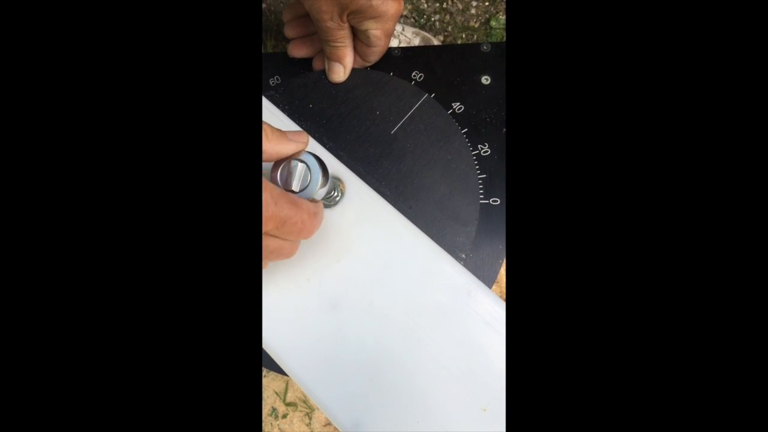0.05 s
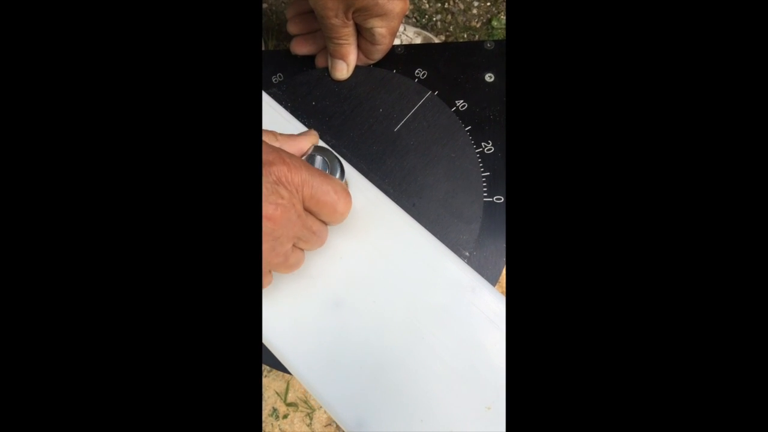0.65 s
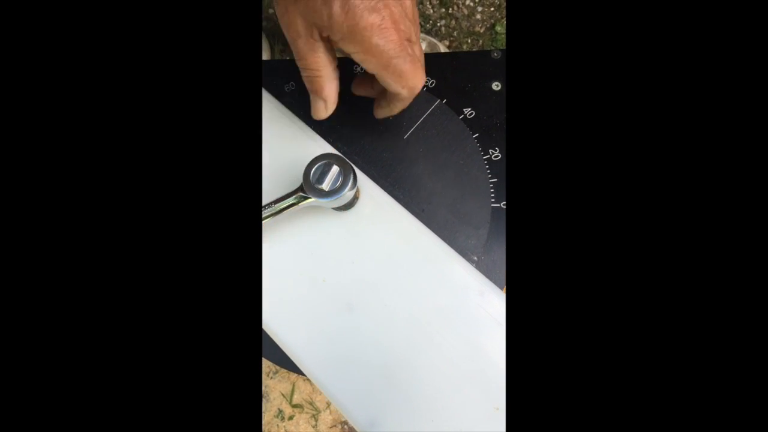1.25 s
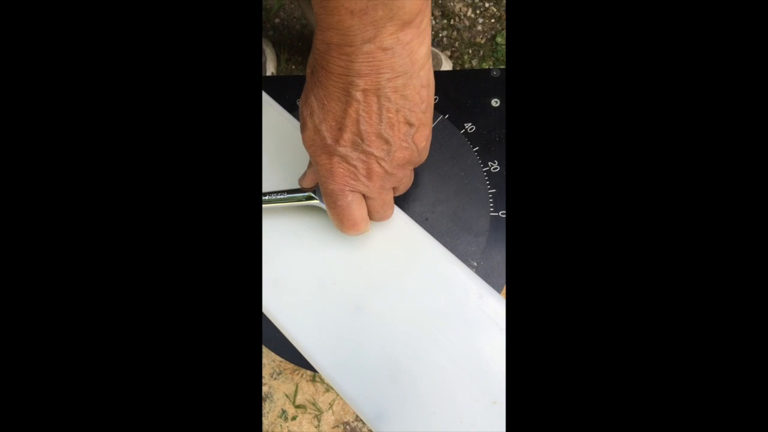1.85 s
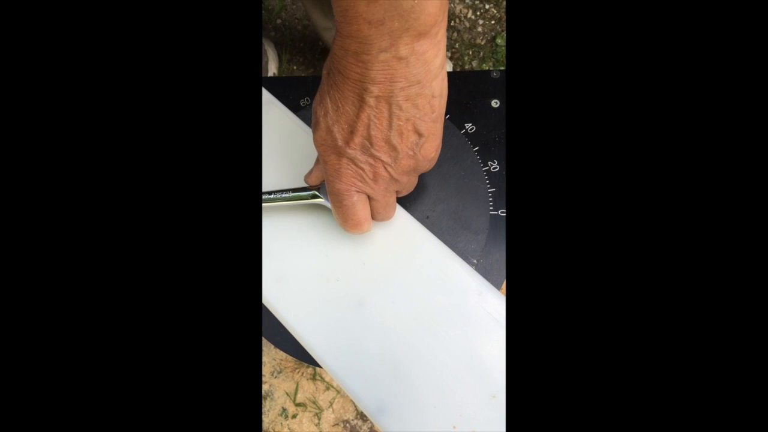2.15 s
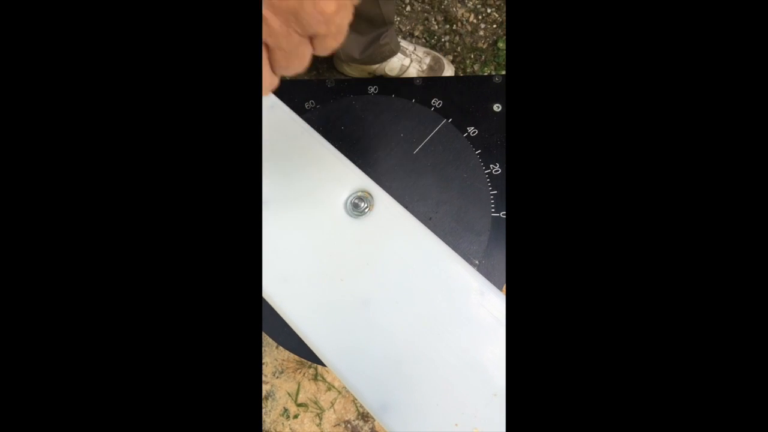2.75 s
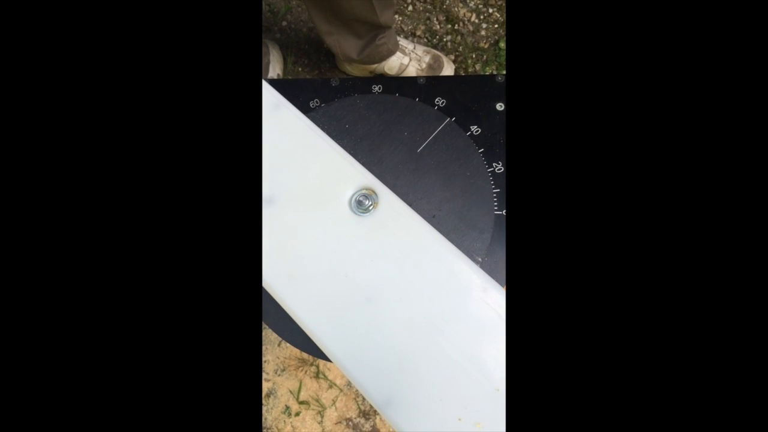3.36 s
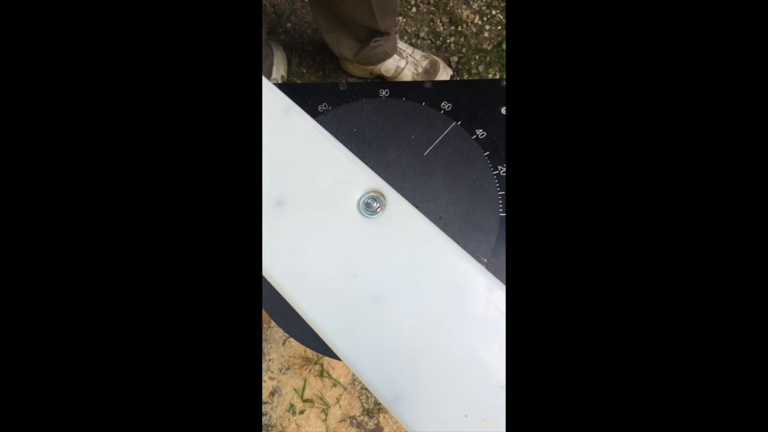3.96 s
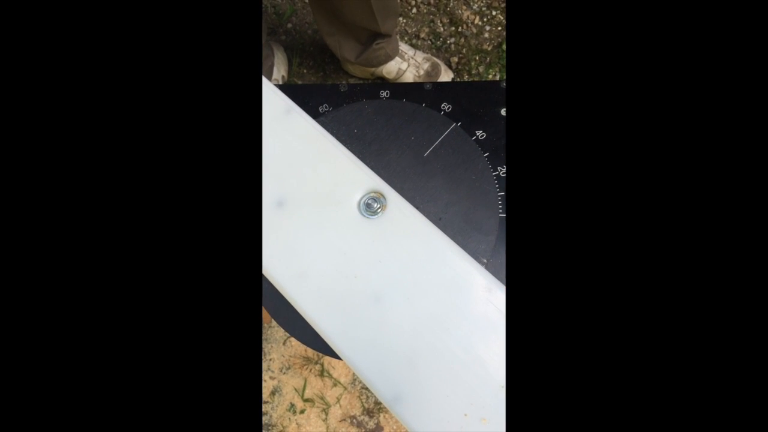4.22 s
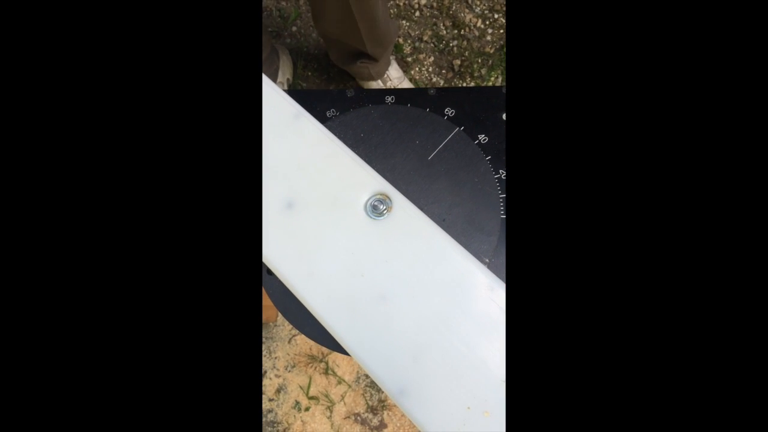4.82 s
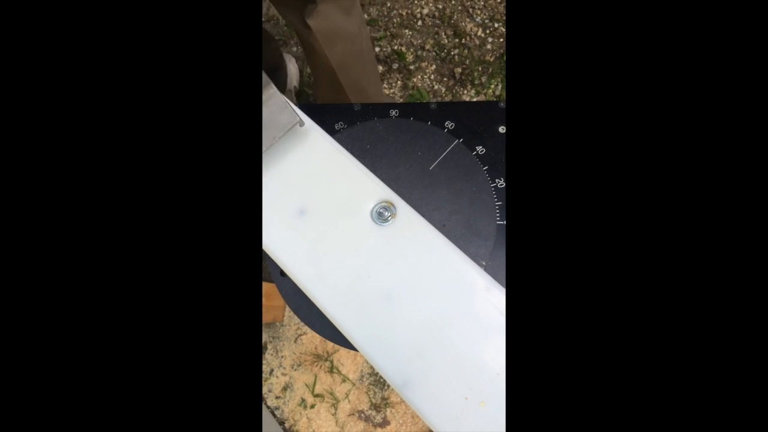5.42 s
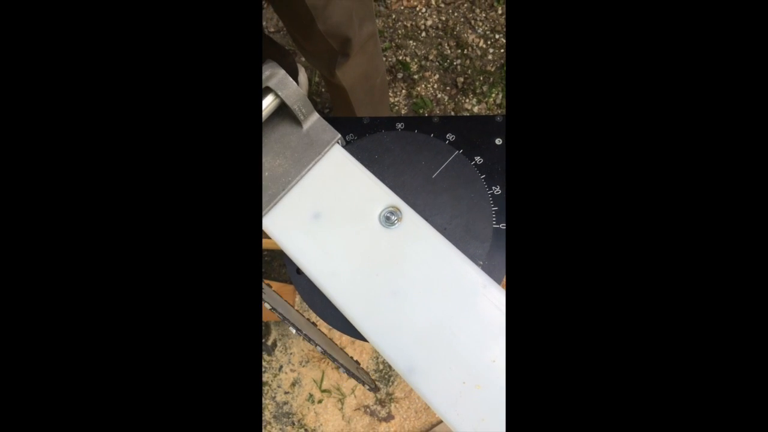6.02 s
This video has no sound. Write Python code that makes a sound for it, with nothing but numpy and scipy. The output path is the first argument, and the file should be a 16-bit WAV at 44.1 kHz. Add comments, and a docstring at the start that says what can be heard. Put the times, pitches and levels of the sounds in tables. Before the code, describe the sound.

The sound is heard from just above a metal cutting table in still outdoor air, with a faint, high insect sizzle coming and going. From 0.2 to 0.8 seconds a ratchet wrench clicks and skids onto a nut, with a small ping near 0.4 and a sharp clack at 0.6. Between 1 and 3 seconds there is faint rubbing of skin on steel, soft microphone handling bumps and a few light clicks. From about 3 to 4.6 seconds the pivoting fence slides quietly on its plate with a low groan. At 3.9 the wrench drops on the table with a double clank and a brief ring, the loudest moment. Small ticks follow, and a shoe scuffs gritty soil from 4.5 onward. The fence knocks three times at about 5.6, 5.8 and 6 seconds, the last with a short metallic ring.

```python
"""Outdoors at a metal cutting table. A ratchet wrench clicks and skids on a nut, then drops on the table.
The pivoting fence slides on its plate, swings round and knocks three times. Each blow excites the
table's modes and rings the part that strikes. A shoe scuffs gritty soil, hands rub and rumble close
to the microphone, and a faint insect sizzles in the grass over still air."""
import sys
import numpy as np
from scipy import signal
from scipy.fft import rfft, irfft, next_fast_len
from scipy.io import wavfile
from scipy.ndimage import uniform_filter1d

SR = 44100
rng = np.random.default_rng(int(sys.argv[2]) if len(sys.argv) > 2 else 0)


def materialize(psi):
    """Save the field psi as 16-bit PCM at rate SR to the path in sys.argv[1].

    A 1-D psi becomes a single channel; in a 2-D psi each row is a channel.
    """
    bounded = np.clip(np.atleast_2d(psi).T, -1, 1)
    quanta = np.round(bounded * 32767).astype(np.int16)
    wavfile.write(sys.argv[1], SR, quanta)


N = 268304
HIT_SAMPLES = 16384
TIME_S, AGE_S = np.arange(N) / SR, np.arange(HIT_SAMPLES) / SR
GRID_HZ = np.geomspace(30, 16000, 55)

# nut and wrench head under the hand: (mode [Hz], peak [dB], t60 [s])
HEAD_MODES = [(187, 7.5, 0.06), (409, 4.5, 0.065), (755.6, 3, 0.064), (875, 8, 0.023), (1451, 10, 0.079),
              (1900, 3, 0.014), (3050, 10, 0.032), (3654, 7, 0.02), (3980, 8, 0.026), (4970, -2, 0.038),
              (5510, -2.5, 0.072), (6810, 11, 0.013), (7360, 8.5, 0.015)]
# fence: (mode [Hz], level [dB], t60 [s])
FENCE_MODES = [(1040, -3, .05), (1980, -8, .05), (2262, 0, .11), (2290, -7, .085), (2274, -30, .4),
               (3000, -6, .035), (3990, -10, .06)]
# low friction of fence and shoe: (frequency [Hz], gain [dB])
DRAG_SPECTRUM = [(71, -38), (120, -14), (156, 3), (264, -8), (379, -3), (527, -7.5), (591, -19.5),
                 (750, -14.5), (980, -30), (1650, -120)]


def amp(db):
    """Decibels to gain."""
    return 10 ** (np.asarray(db) / 20)


def unit(x):
    """Scale to rms 1."""
    return x / np.sqrt(np.mean(x ** 2))


def add(out, time_s, x):
    """Mix x in at time_s."""
    i = max(int(time_s * SR), 0)
    out[i:i + len(x)] += x[:max(N - i, 0)]


def colour(x, spectrum):
    """Minimum-phase filter through (frequency [Hz], gain [dB]) points."""
    hz, db = np.transpose(spectrum)
    n = next_fast_len(len(x), True)
    bins_hz = np.maximum(np.arange(n // 2 + 1) * SR / n, 1)
    gain = amp(np.interp(np.log(bins_hz), np.log(hz), db))
    cepstrum = irfft(np.log(gain), n)
    cepstrum[1:n // 2] *= 2
    cepstrum[n // 2 + 1:] = 0
    return irfft(rfft(x, n) * np.exp(rfft(cepstrum)), n)[:len(x)]


def hump(db, hz, db_per_octave):
    """Gains on GRID_HZ, peaking at hz; slopes are (below, above)."""
    below, above = db_per_octave
    octave = np.log2(GRID_HZ / hz)
    return amp(db + below * np.minimum(octave, 0) - above * np.maximum(octave, 0))


def blend(first, second):
    """Power sum of two humps as (frequency [Hz], gain [dB])."""
    return np.column_stack([GRID_HZ, 20 * np.log10(np.hypot(first, second))])


def walk(rate_hz):
    """Slow random drift, rms 1."""
    step = int(SR / rate_hz)
    stairs = np.repeat(rng.standard_normal(400), step)[:N]
    return unit(uniform_filter1d(stairs, step))


def strokes(rows):
    """One rounded arch per movement; one gain curve per level column."""
    out = 0
    for start_s, length_s, *levels_db in rows:
        progress = np.clip((TIME_S - start_s) / length_s, 0, 1)
        arch = np.abs(np.sin(np.pi * progress)) ** 0.49
        out = out + np.outer(amp(levels_db), arch)
    return out


def friction(spectrum, grain_db):
    """Dense tiny slips of unequal size in uneven spurts, rms 1."""
    sizes = np.repeat(rng.exponential(size=N // 40 + 1), 40)[:N]
    slips = rng.standard_normal(N) * amp(grain_db * np.minimum(sizes, 5))
    spurts = amp(1.6 * walk(rate_hz=40))
    return unit(colour(slips * spurts, spectrum))


def fade(t60_s):
    """Free decay after a blow."""
    return np.exp(-np.log(1000) * AGE_S / t60_s)


def ring(modes, rattle=0, rise_s=0.00013):
    """Partials of a struck part; they flutter as it rattles on its support."""
    out = 0
    for hz, db, t60_s in modes:
        flutter = 1 + rattle * unit(uniform_filter1d(rng.standard_normal(HIT_SAMPLES), size=400))
        out = out + amp(db) * fade(t60_s) * flutter * np.sin(2 * np.pi * hz * AGE_S)
    return out * (1 - np.exp(-AGE_S / rise_s))


def body(modes):
    """Impulse response with resonance peaks of the given heights."""
    out = 0
    for hz, db, t60_s in modes:
        gain = amp(db) * 2 * np.log(1000) / (t60_s * SR)
        out = out + gain * fade(t60_s) * np.cos(2 * np.pi * hz * AGE_S)
    return out


def dense_modes(t60_3khz_s, low_hold, tail_db, tail_t60_s):
    """Countless short modes, unit energy; lows last longer, the surroundings add a faint tail."""
    out = 0
    for hz in 110 * 2. ** np.arange(8):
        edges_hz = [hz / np.sqrt(2), min(hz * np.sqrt(2), SR / 2 - 1)]
        band = signal.butter(2, edges_hz, "band", fs=SR, output="sos")
        t60_s = t60_3khz_s * (3000 / max(hz, 300)) ** low_hold
        envelope = fade(t60_s) + amp(tail_db) * fade(tail_t60_s)
        burst = rng.standard_normal(HIT_SAMPLES) * envelope
        out = out + unit(signal.sosfilt(band, burst)) * np.sqrt(hz)
    return unit(out) / np.sqrt(HIT_SAMPLES)


def air(rms_db):
    """Still outdoor background: steady noise, mostly low."""
    # background: (frequency [Hz], gain [dB])
    spectrum = [(15, -36.5), (25, -3.5), (59, -3.5), (161, 0.5), (270, -8.5), (560, -11.5), (754, -12.5),
                (911, -12.5), (6560, -22), (8140, -25), (9320, -25), (14400, -28.5), (16000, -40.5)]
    return amp(rms_db) * unit(colour(rng.standard_normal(N), spectrum))


def handling(hold_db, wander_db, grip_gain_db, bump_rise_s):
    """The hand on the microphone rumbles, shifts grip and bumps softly."""
    # rumble: (frequency [Hz], gain [dB])
    spectrum = [(12, -43), (20, -12), (39, -2.5), (59, 2.5), (113, -7), (188, -23.5), (220, -18.5),
                (250, -27), (320, -54.5), (550, -120)]
    # grip shifts: (start [s], length [s], relative level [dB])
    grips = [(.25, 0.56, -68), (.98, .34, -64.5), (1.33, 0.36, -60), (1.75, 0.097, -69), (2.02, 0.11, -62),
             (2.38, .22, -66), (3.13, 0.096, -70.5), (3.52, 0.23, -65.5), (4.08, 0.29, -64),
             (4.55, 0.19, -64.5), (5.68, 0.37, -65)]
    # soft bumps: (time [s], peak [dB], pitch [Hz])
    bumps = [(1.039, -53, 60.6), (1.436, -52, 55.3), (1.594, -42.5, 58), (1.645, -44.5, 69),
             (2.072, -45.5, 63), (2.554, -40.5, 62), (4.213, -38, 77.3)]
    shifts, = strokes(grips)
    hold = amp(hold_db + wander_db * walk(rate_hz=3.7))
    out = (hold + amp(grip_gain_db) * shifts) * friction(spectrum, grain_db=2.5)
    swell = (AGE_S / bump_rise_s * np.exp(1 - AGE_S / bump_rise_s)) ** 2
    for time_s, peak_db, hz in bumps:
        add(out, time_s, amp(peak_db) * swell * np.sin(2 * np.pi * hz * AGE_S))
    return out


def clicks(graze_s, graze_db):
    """Wrench on nut and slack in the fittings: a graze, then a dull clack with a steel tick."""
    # light contacts: (time [s], clack [dB], clack [Hz], tick [dB], tick [Hz])
    contacts = [(0.21, -10, 1110, 2, 5650), (0.2145, -2, 980, -20, 4960), (0.2358, -15, 750, -18, 4500),
                (0.255, -12, 900, -39, 4500), (0.266, -30, 900, -14, 4260), (0.3578, -30, 800, -8.5, 5400),
                (0.363, -2, 650, -5.5, 5730), (0.367, -5, 493, -15, 5000), (0.4305, -8, 2804, -2, 9570),
                (0.466, -8.5, 420, -24, 8500), (0.538, -16, 750, -38, 3500), (0.6, 13.5, 940, 2.5, 7300),
                (0.6049, 7.5, 510, -12, 6900), (0.619, 0.5, 860, -23, 5500),
                (0.655, -10, 1000, -31.5, 7000), (0.671, -10.5, 610, -36, 8000),
                (0.743, -10, 950, -27.5, 5480), (1.205, -16, 600, -16, 6400),
                (1.712, -20, 791, -29.5, 6140), (2.405, -3, 780, -15.5, 4400),
                (2.539, -30, 800, -22.5, 2980), (2.595, -12.5, 520, -46, 8000),
                (2.642, -29, 694, -8.5, 4740), (2.884, -8.5, 215, -55, 3000), (2.931, -13, 218, -37, 2500),
                (3.03, -32, 400, -19.5, 5670), (3.5, -25.5, 1000, -21, 2604),
                (4.238, -15, 1000, -39.5, 9070), (4.388, -12, 400, -8, 3000), (4.393, -8, 913, -18.5, 6480),
                (4.601, -8.5, 696, -41, 5000), (4.838, -13, 1120, -24, 4000),
                (5.021, -30, 600, -19.5, 10500), (5.026, -12, 220, -17.5, 6500), (5.35, -9, 480, -45, 5900),
                (5.508, 1.5, 430, -44, 8900)]
    out, head = np.zeros(N), body(HEAD_MODES)
    for time_s, clack_db, clack_hz, tick_db, tick_hz in contacts + pivot_slack(count=6):
        dense = dense_modes(t60_3khz_s=0.038, low_hold=0.38, tail_db=-32, tail_t60_s=0.055)
        hit = amp(-2) * dense + amp(-5.5) * head
        hit[0] += amp(-12)  # direct impulse
        clack = hump(clack_db, clack_hz, db_per_octave=(7, 10.14))
        tick = hump(tick_db, tick_hz, db_per_octave=(4.8, 17))
        spectrum = blend(clack, tick)
        add(out, time_s, colour(hit, spectrum))
        # the parts brush just before they seat
        ramp = AGE_S * (AGE_S < graze_s)
        graze = unit(rng.standard_normal(HIT_SAMPLES) * ramp) / np.sqrt(HIT_SAMPLES)
        add(out, time_s - graze_s, amp(graze_db) * colour(graze, spectrum))
    return out


def scrapes(grain_db, hiss_hz, db_per_octave):
    """Metal skids on metal: a short swell of tiny impacts rings the fittings."""
    # skids: (start [s], length [s], level [dB], centre [Hz], hiss [dB])
    skids = [(0.323, 0.04, -12, 1400, -26.5), (2.41, 0.026, -19.5, 1610, -52),
             (2.612, 0.045, -18, 2370, -31), (3.86, 0.048, 8.5, 800, -4.5), (5.927, 0.037, -5.5, 1590, -33),
             (5.974, 0.028, -3.5, 936, -37)]
    out, fittings = np.zeros(N), amp(-2) * body(HEAD_MODES)
    fittings[0] += 1  # direct impulse
    for start_s, length_s, db, hz, hiss_db in skids:
        sizes = amp(grain_db * np.minimum(rng.exponential(size=HIT_SAMPLES), 6))
        swell = np.sin(np.pi * np.minimum(AGE_S / length_s, 1))
        impacts = rng.standard_normal(HIT_SAMPLES) * sizes * swell
        chatter = signal.fftconvolve(impacts, fittings)[:HIT_SAMPLES]
        spectrum = blend(hump(db, hz, db_per_octave), hump(hiss_db, hiss_hz, db_per_octave))
        add(out, start_s, colour(unit(chatter) / np.sqrt(HIT_SAMPLES), spectrum))
    return out


def insect(start_hz, top_hz, creep_s, wander_hz, width_hz, flutter_db, rest_db):
    """Narrow, fluttering sizzle in phrases; its pitch wanders, creeps up and levels off."""
    # phrases: (start [s], length [s], level [dB])
    phrases = [(.4, 0.52, -76.5), (.93, 0.22, -81.5), (1.32, 0.78, -80), (2.06, 1.1, -84),
               (3.2, 0.33, -80.5), (4.25, 0.28, -81.5), (5.2, 0.72, -81)]
    song, = strokes(phrases)
    hz = top_hz - (top_hz - start_hz) * np.exp(-TIME_S / creep_s) + wander_hz * walk(rate_hz=7.4)
    carrier = np.exp(2j * np.pi * np.cumsum(hz) / SR)
    noise = rng.standard_normal(N) + 1j * rng.standard_normal(N)
    rasp = signal.sosfilt(signal.butter(2, width_hz / 2, fs=SR, output="sos"), noise)
    gain = (song + amp(rest_db)) * amp(flutter_db * walk(rate_hz=25))
    return gain * unit(np.real(rasp * carrier))


def socket_ping(time_s, gain_db):
    """The socket rings once as it slips over the nut."""
    # hand-held steel socket: (mode [Hz], level [dB], t60 [s])
    modes = [(6830, 1, 0.065), (7180, -23.5, .06), (9290, -36, .07), (11070, -12, 0.034),
             (14740, -14.5, 0.066), (15090, -28.5, .07)]
    out = np.zeros(N)
    add(out, time_s, amp(gain_db) * ring(modes))
    return out


def hand_rub():
    """Skin rubs on the steel wrench."""
    # rubs: (start [s], length [s], level [dB])
    rubs = [(1.1, 0.23, -64), (2.2, 0.25, -73), (2.5, 0.34, -82), (2.8, .3, -74.5)]
    # skin on steel: (frequency [Hz], gain [dB])
    spectrum = [(880, -41), (1500, 1), (2570, 0.5), (2940, 6), (3210, 0), (3480, 1.5), (10200, 0.5),
                (15500, -7)]
    rub, = strokes(rubs)
    return rub * friction(spectrum, grain_db=2.5)


def fence_slide(slide_gain_db, groan_gain_db):
    """The pushed fence slides on its plate with a low groan."""
    # pushes: (start [s], length [s], relative slide [dB], relative groan [dB])
    pushes = [(2.93, .24, -74, -70.5), (3.22, 0.23, -73, -67), (3.53, 0.26, -60, -64.5),
              (4.0, 0.27, -70, -67.5), (4.22, 0.38, -75.5, -71)]
    # fence on plate: (frequency [Hz], gain [dB])
    spectrum = [(350, -30), (600, -12.5), (696, -14), (923, 1), (1060, -4), (1400, -10.5), (2600, -17.5),
                (3460, -24), (6170, -22.5), (10300, -27), (15000, -35)]
    slide, groan = strokes(pushes)
    out = slide * amp(slide_gain_db) * friction(spectrum, grain_db=4)
    return out + groan * amp(groan_gain_db) * friction(DRAG_SPECTRUM, grain_db=2.5)


def table_blow(db, hz, edge_db, edge_hz, t60_3khz_s):
    """One contact excites the table's modes: a thud with a hard edge."""
    # table: (mode [Hz], peak [dB], t60 [s])
    modes = [(112, 5, .16), (147, 10, .14), (188, 5, .1), (340, 9, .075), (403, 6, .09), (493, 6, .08),
             (543, 9, .09), (643, 4, .1), (778, 8, .07), (922, 10, .08), (1030, 7, .065), (1250, 4, .06),
             (1450, 5, .055), (1830, 3, .07), (2430, 2, .06), (2850, 1, .06)]
    # weaker radiation below the lowest modes and in the gap above them: (frequency [Hz], gain [dB])
    radiation = [(30, 0), (75, -2), (140, -0.5), (255, -4), (370, 0)]
    dense = dense_modes(t60_3khz_s, low_hold=0.29, tail_db=-42, tail_t60_s=0.16)
    hit = amp(-2.5) * dense + amp(-9.5) * body(modes)
    hit[0] += amp(-16)  # direct impulse
    thud = hump(db, hz, db_per_octave=(6.2, 14.2))
    edge = hump(edge_db, edge_hz, db_per_octave=(2.5, 31))
    return colour(colour(hit, radiation), blend(thud, edge))


def knocks(rows, part_ring, edge_hz):
    """A part strikes the table, rings and rebounds with a softer edge."""
    out = np.zeros(N)
    for time_s, db, hz, edge_db, lag_s, rebound_db, rebound_hz, ring_db in rows:
        strike = table_blow(db, hz, edge_db, edge_hz, t60_3khz_s=0.031)
        rebound = table_blow(rebound_db, rebound_hz, edge_db - 6.5, edge_hz, t60_3khz_s=0.058)
        add(out, time_s, strike + amp(ring_db) * part_ring)
        add(out, time_s + lag_s, rebound)
    return out


def wrench_drop(fence_ring, fence_gain_db):
    """The wrench lands head first, then handle; the fence rings along."""
    # free wrench: (mode [Hz], level [dB], t60 [s])
    modes = [(3698, 0, .07), (3712, -31, .5), (6815, -11, .07), (6850, -26, .36), (7080, -2, .035),
             (9685, -12, .055), (11130, -33, .25), (13810, -17, .08), (14400, -8, .035), (14970, -11, .045)]
    # landings: (time [s], strike [dB], strike [Hz], edge [dB],
    # rebound lag [s], rebound [dB], rebound [Hz], ring [dB])
    landings = [(3.861, 27.5, 485, -1.5, .0043, 34, 157, -24),
                (3.9019, 28, 741, -19.5, .0056, 24, 560, -53)]
    out = knocks(landings, ring(modes, rattle=0.4), edge_hz=11500)
    for time_s, *_ in landings:
        add(out, time_s, amp(fence_gain_db) * fence_ring)
    return out


def settling(gap_s, loss_db, thud_hz):
    """Wrench and fence each settle in three soft, fading bounces."""
    # first bounces: (time [s], level [dB])
    first_bounces = [(3.943, 22.5), (5.627, 16.5)]
    out = np.zeros(N)
    for time_s, db in first_bounces:
        for k in range(3):
            bounce = table_blow(db - k * loss_db, thud_hz, db - 50.5, edge_hz=5630, t60_3khz_s=0.058)
            add(out, time_s + k * gap_s, bounce)
    return out


def pivot_slack(count, span_s=(4.1, 8.8), mean_db=-23.5, spread_db=6.5, clack_hz=600, tick_hz=5000):
    """Faint random clicks of slack in the pivot, as contact rows; those past the end go unheard."""
    when, size = rng.random((count, 2)).T
    levels_db = mean_db + spread_db * (2 * size - 1)
    times_s = span_s[0] + (span_s[1] - span_s[0]) * when
    return [(time_s, db, clack_hz, db - 14, tick_hz) for time_s, db in zip(times_s, levels_db)]


def fence_swing(fence_ring, stop_s, stop_gain_db):
    """The swung fence knocks three times; the last knock rings the end stop."""
    # knocks: (time [s], strike [dB], strike [Hz], edge [dB],
    # rebound lag [s], rebound [dB], rebound [Hz], ring [dB])
    swings = [(5.607, 13, 713, -20, 0.0053, 19, 326, -37.5), (5.818, 19.5, 970, -17, 0.0074, 23, 350, -30),
              (5.9645, 20, 1290, 0, .0035, 24.5, 160, -35)]
    # end stop: (mode [Hz], level [dB], t60 [s])
    stop_modes = [(2084, -4.5, 0.057), (2260, -0.5, 0.072), (2230, -26, 0.19), (2820, -5.5, 0.017),
                  (3500, -16, 0.037), (4620, -24.5, 0.052), (6040, -47, .04)]
    out = knocks(swings, fence_ring, edge_hz=5630)
    add(out, stop_s, amp(stop_gain_db) * ring(stop_modes, rattle=0.15))
    return out


def shoe_scuff(scuff_gain_db, scrape_gain_db):
    """A sole drags over grit: scuff, low scrape and sand hiss."""
    # drags: (start [s], length [s], relative scuff [dB], relative scrape [dB], sand [dB])
    drags = [(4.54, .2, -70, -75, -70), (4.68, .24, -58.5, -64, -68.5), (4.87, 0.38, -69, -61, -70),
             (5.22, 0.19, -71.5, -72.5, -72.5), (5.48, .36, -67, -71.5, -74), (5.9, 0.17, -63, -76, -95)]
    # sole on grit: (frequency [Hz], gain [dB])
    scuff_spectrum = [(290, -23), (500, -2.5), (636, -1), (764, -7), (926, 2.5), (1010, -2), (2040, -6.5),
                      (5000, -21), (6500, -70), (11000, -120)]
    # sand hiss: (frequency [Hz], gain [dB])
    sand_spectrum = [(2000, -6.5), (5000, -4), (9000, -7), (15000, -13)]
    scuff, scrape, sand = strokes(drags)
    out = scuff * amp(scuff_gain_db) * friction(scuff_spectrum, grain_db=2.5)
    out += scrape * amp(scrape_gain_db) * friction(DRAG_SPECTRUM, grain_db=2.5)
    return out + sand * friction(sand_spectrum, grain_db=2)


def scene():
    """Mono mix, heard from just above the table."""
    fence_ring = ring(FENCE_MODES, rattle=0.2)
    out = air(rms_db=-71)
    out += handling(hold_db=-78.5, wander_db=4, grip_gain_db=2, bump_rise_s=0.0059)
    out += clicks(graze_s=0.006, graze_db=-24)
    out += scrapes(grain_db=4, hiss_hz=9000, db_per_octave=(4.6, 12))
    out += insect(start_hz=7600, top_hz=8230, creep_s=1.8, wander_hz=71, width_hz=750,
                  flutter_db=3.5, rest_db=-91)
    out += socket_ping(time_s=0.4306, gain_db=-17.5)
    out += hand_rub()
    out += fence_slide(slide_gain_db=-2, groan_gain_db=-2.1)
    out += wrench_drop(fence_ring, fence_gain_db=-40)
    out += settling(gap_s=0.012, loss_db=7, thud_hz=240)
    out += shoe_scuff(scuff_gain_db=1.5, scrape_gain_db=1)
    out += fence_swing(fence_ring, stop_s=5.9665, stop_gain_db=-11.5)
    return out[None]


def record(dry):
    """Steep low-pass at 15.5 kHz."""
    return signal.sosfilt(signal.ellip(8, .2, 70, 15500, fs=SR, output="sos"), dry)


dry = scene()
out = record(dry)
materialize(out)
```